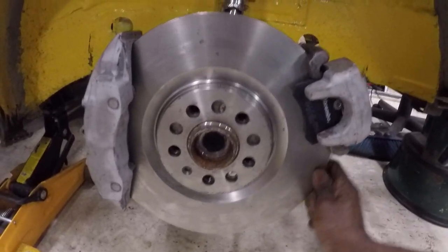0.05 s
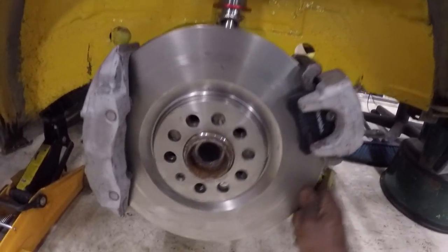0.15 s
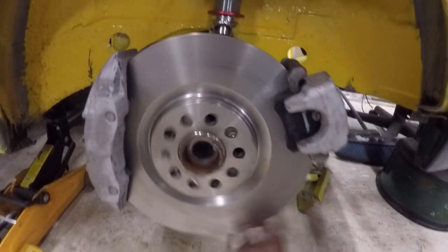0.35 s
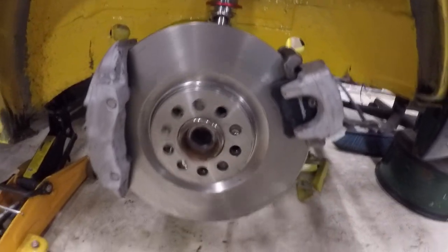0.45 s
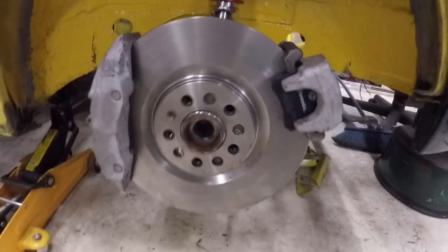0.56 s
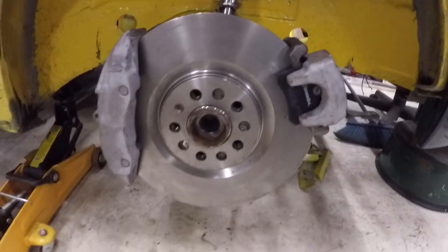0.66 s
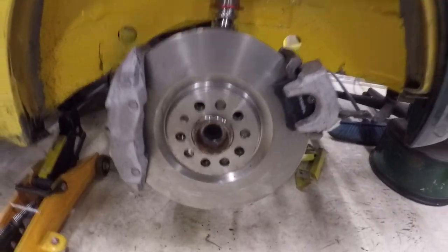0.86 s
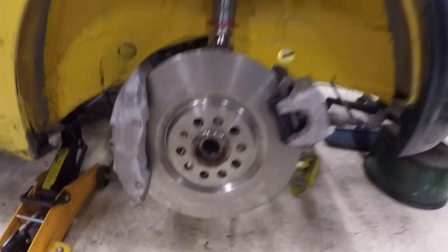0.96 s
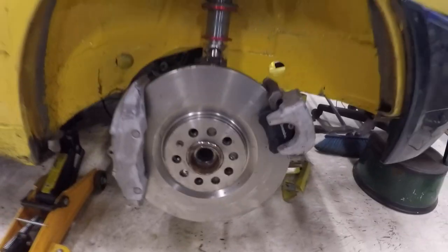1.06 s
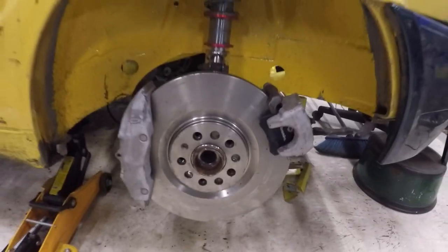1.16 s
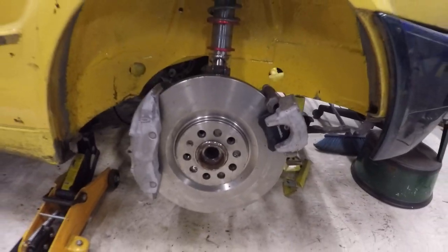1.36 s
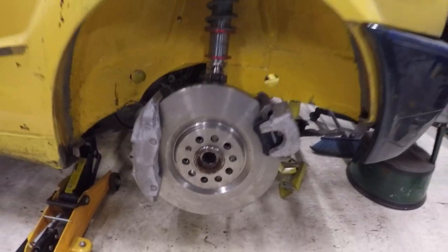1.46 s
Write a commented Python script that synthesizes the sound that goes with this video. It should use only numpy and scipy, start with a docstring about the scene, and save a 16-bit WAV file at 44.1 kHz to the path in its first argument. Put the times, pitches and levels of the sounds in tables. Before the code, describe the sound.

Close up in a quiet workshop, a turning metal brake disc rubs, bites into a brake part several times and stops, ringing lightly while its hub rumbles. Then clothes rustle softly and the hand-held microphone is jostled.

```python
"""A steel brake disc, turned by hand, rubs lightly, bites into a brake part a few times, drags on and stops.
Friction acts as a train of tiny random slips, or grains, which excite the normal modes of the disc and
the resonances of the parts that touch it, while the hub rumbles. Then clothes rustle and a hand-held
camera is jostled and knocked. A quiet workshop adds steady air noise and a short reverberation."""
import sys
import numpy as np
from scipy import signal
from scipy.fft import rfft, irfft, next_fast_len
from scipy.io import wavfile
from scipy.ndimage import map_coordinates

SR = 44100
rng = np.random.default_rng(int(sys.argv[2]) if len(sys.argv) > 2 else 0)


def dump_mix(stems):
    """Bounce the given channels to the path in sys.argv[1] as a 16-bit WAV at rate SR."""
    frames = np.atleast_2d(stems).T  # one column per channel
    limited = np.clip(frames, -1, 1)  # hard clip at full scale
    pcm = np.round(limited * 32767).astype(np.int16)
    wavfile.write(sys.argv[1], SR, pcm)


N = 66150

# Spectral shapes of the noises: frequency_hz, relative_density_db
AIR_SPECTRUM = [(30, -6.5), (100, 5.5), (180, 3.5), (300, -4), (700, -7), (2000, -14), (5000, -16.5),
                (10000, -23), (15000, -25.5)]
JOSTLE_SPECTRUM = [(15, -28), (28, -19), (39, 4.5), (55, -16), (78, -6), (120, -14), (250, -40), (800, -66)]
SCUFF_SPECTRUM = [(80, -28), (180, -19), (320, 6.5), (480, 3.5), (750, -10), (2000, -15), (8000, -38)]
RUSTLE_SPECTRUM = [(200, 9.5), (600, -2.5), (1500, -2.5), (3600, 1.5), (6500, -6.5), (10000, -13.5),
                   (15000, -19)]
BRUSH_SPECTRUM = [(200, -5), (700, -4.5), (1400, -2), (2200, -6), (5000, -15), (15000, -26)]
SWISH_SPECTRUM = [(1000, -11), (4500, -1.5), (6700, -0.5), (9000, -6.5), (15000, -12)]
HUB_SPECTRUM = [(30, -48), (70, -5.5), (98, -3), (150, -3.5), (200, 0.5), (260, -12), (400, -14),
                (700, -40), (2000, -65)]
SCRATCH_SPECTRUM = [(150, 3.5), (400, -1.5), (800, -4), (1400, -12.5), (2300, 2), (2900, -6), (3800, -4.5),
                    (6000, -17.5), (7600, -18), (9700, -24.5), (15000, -68)]

# Brief sliding motions of hand and cloth: peak_s, level_db, rise_s, fall_s
GRIP_SCUFFS = [(1.1, -54, 0.0074, 0.015), (1.18, -58.5, 0.015, 0.03), (1.415, -59, 0.0086, 0.037)]
CLOTH_RUSTLES = [(.895, -52.5, 0.028, 0.076), (1.175, -54.5, 0.032, 0.016), (1.184, -51, .003, .004),
                 (1.27, -58, 0.17, 0.1), (1.455, -53, 0.045, 0.055)]
DULL_BRUSHES = [(1.02, -58, 0.064, 0.13)]
BRIGHT_SWISHES = [(1.068, -55, 0.0061, 0.0096), (1.17, -58.5, 0.043, 0.026)]

# Envelopes of the jostling, the hub rumble and the rubbing force: time_s, level_db
JOSTLE_ENVELOPE = [(0, -49), (.05, -51), (.12, -54), (.4, -58), (.5, -37), (.6, -35.5), (.66, -41.5),
                   (.73, -46.5), (.82, -41.5), (1.1, -53), (1.38, -48.5), (1.5, -60.5)]
HUB_ENVELOPE = [(0, -69), (.11, -53), (.22, -49), (.3, -37.5), (.345, -31.5), (.385, -26.5), (.42, -35),
                (.465, -33.5), (.52, -46), (.65, -45.5), (.77, -46), (.87, -66.5), (1.1, -74)]
RUB_ENVELOPE = [(.095, -66), (.116, -50.5), (.18, -47), (.226, -41), (.28, -36.5), (.298, -39), (.335, -32),
                (.395, -39.5), (.428, -33.5), (.445, -31), (.474, -31.5), (.501, -41.5), (.511, -34),
                (.53, -38), (.59, -32), (.63, -39), (.66, -42), (.705, -45.5), (.727, -52.5), (.76, -66)]

# Transfer of the rubbing force into dry scratch and into the disc: time_s, gain_db
SCRATCH_COUPLING = [(.12, -6), (.335, -8.5), (.38, 0), (.46, -1.5), (.6, -9), (.72, -6)]
DISC_COUPLING = [(.12, -16.5), (.2, -13), (.28, -12.5), (.35, -11), (.41, -9.5), (.46, -10), (.52, -6.5),
                 (.59, -16), (.66, -9.5), (.72, -22)]

# Resonances of the touching parts in each state of contact: pitch_hz, bandwidth_hz, relative_gain_db
LIGHT_RUB_MODES = [(340, 11, -4), (686, 28, 0.5), (1229, 15.4, 7.5), (1342, 54, -3), (1680, 73, -5.5),
                   (1790, 55, -2.5), (2034, 40, 5.5), (2393, 14, 4), (3100, 75, -4), (5330, 52, -3)]
CAUGHT_MODES = [(584, 32, 0.5), (932, 33, 0), (1033, 150, -1.5), (2129, 29, 6.5), (2250, 83, -8),
                (3950, 39, 0.5)]
DRAG_MODES = [(549, 49, -1.5), (923, 24, 3.5), (1037, 40, -1.5), (1297, 110, -9), (1650, 89, -0.5),
              (1985, 61, 5), (2170, 260, -2.5), (2420, 32, -15), (2830, 100, -7.5), (4060, 69, -5.5),
              (4663, 38, 2)]

# Hard bites of the disc into a brake part: start_s, level_db, decay_s, pitch_hz
HARD_BITES = [(.4465, -23, .009, 1020), (.4535, -26, .007, 2150), (.4690, -24, .007, 2150),
              (.5060, -24, .009, 990)]
# Normal modes of the disc: pitch_hz, gain_db
DISC_MODES = [(2024, -7), (2398, -7.5), (3278, -5), (3448, -8), (4135, -11), (4285, -13), (4640, -4),
              (5812, -15), (6054, -5), (6495, -22), (7468, -19), (7735, -21), (8280, -19.5), (8586, -17.5),
              (8940, -22), (10400, -13.5), (10725, -21), (11050, -26), (11900, -19.5), (12680, -29),
              (13450, -18.5), (15060, -28)]
# Flares of the disc's main mode: peak_s, level_db
MODE_FLARES = [(.128, -56), (.28, -45), (.412, -36.5), (0.476, -45), (0.521, -32.5), (0.583, -39),
               (.655, -45), (.705, -53.5)]
# Light touches as the disc stops: start_s, level_db
LAST_TOUCHES = [(.743, -48), (.801, -56.5)]

GRAINS_PER_S, GRAIN_SPREAD_DB = 4500, 3.5
CHATTER_DB, CHATTER_PER_S = 1.4, 190
CATCH_S, DRAG_S, SHIFT_S = .43, .526, .014  # two changes of contact and the length of each
SING_DB, SING_WAVER_DB, SING_WAVER_PER_S = 1.5, 1, 36
DISC_BANDWIDTH_HZ, BANDWIDTH_HZ_PER_KHZ, DRAG_RISE_HZ = 23.7, 1, 18.46
BITE_ATTACK_S, BITE_BANDWIDTH_HZ, BITE_SCRATCH_DB, BITE_DISC_DB = .0015, 49, -6, -12
CONTACT_CUTOFF_HZ, BAND_LIMIT_HZ = 7400, 15330
TIME_S = np.arange(N) / SR


def amp(db):
    """Amplitude ratio of a level in decibels."""
    return 10 ** (np.asarray(db) / 20)


def unit_rms(x):
    """Normalisation to a mean square of one."""
    return x / np.sqrt(np.mean(x ** 2) + 1e-20)


def envelope(points):
    """Amplitude envelope by linear interpolation in decibels."""
    return amp(np.interp(TIME_S, *np.transpose(points)))


def swells(rows):
    """Incoherent addition: asymmetric Gaussian envelopes sum in power."""
    power = np.zeros(N)
    for peak_s, level_db, rise_s, fall_s in rows:
        width_s = np.where(TIME_S < peak_s, rise_s, fall_s)
        power += amp(level_db) ** 2 * np.exp(-((TIME_S - peak_s) / width_s) ** 2)
    return np.sqrt(power)


def wobble(knots_per_s):
    """Smooth random modulation: a spline through Gaussian values."""
    return map_coordinates(rng.standard_normal(4096), [TIME_S * knots_per_s], mode="wrap")


def filtered(x, response):
    """Linear filtering: the spectrum is multiplied by a frequency response."""
    size = next_fast_len(N + SR // 2)
    return irfft(rfft(x, size) * response(np.fft.rfftfreq(size, 1 / SR)), size)[:N]


def coloured(x, spectrum):
    """Spectral shaping that conserves the power of white noise."""
    hz, db = np.transpose(spectrum)
    return filtered(x, lambda f: unit_rms(amp(np.interp(np.log(f + 1), np.log(hz), db))))


def noise(spectrum):
    """Spectrally shaped Gaussian noise of unit rms."""
    return unit_rms(coloured(rng.standard_normal(N), spectrum))


def resonate(x, modes):
    """Modal superposition: damped resonators of alternating sign, conserving white-noise power."""
    def response(f):
        total = sum((-1) ** k * amp(db) * 1j * f * width / (hz * hz - f * f + 1j * f * width)
                    for k, (hz, width, db) in enumerate(modes))
        return total / np.sqrt(np.mean(np.abs(total) ** 2))
    return filtered(x, response)


def tap(start_s, level_db, pitch_hz, t60_s, attack_s=.0013):
    """Free vibration: one mode decays exponentially after a soft contact."""
    age_s = np.maximum(TIME_S - start_s, 0)
    fade = np.exp(-np.log(1000) * age_s / t60_s) * (1 - np.exp(-age_s / attack_s))
    return amp(level_db) * fade * np.sin(2 * np.pi * pitch_hz * age_s)


def workshop_air(level_db=-56):
    """Stationary noise forms the ambient floor of the room."""
    return amp(level_db) * noise(AIR_SPECTRUM)


def reverberation(x, gain_db=-13.5, t60_s=.2):
    """Diffuse reflections: convolution with exponentially decaying noise."""
    delay_s = np.arange(SR // 2) / SR
    tail = rng.standard_normal(len(delay_s)) * np.exp(-np.log(1000) * delay_s / t60_s)
    return amp(gain_db) * signal.fftconvolve(x, tail / np.linalg.norm(tail))[:N]


def camera_handling():
    """Structure-borne sound: low jostling, scuffs of the grip and a small knock on the camera body."""
    jostle = envelope(JOSTLE_ENVELOPE) * noise(JOSTLE_SPECTRUM)
    scuffs = swells(GRIP_SCUFFS) * noise(SCUFF_SPECTRUM)
    knock = tap(start_s=1.13, level_db=-43.5, pitch_hz=483, t60_s=.057)
    return jostle + scuffs + knock


def clothes(roughness_db=1.5):
    """Sliding friction of cloth radiates swells of broadband noise."""
    roughness = amp(roughness_db * wobble(knots_per_s=300))
    rustles = swells(CLOTH_RUSTLES) * unit_rms(noise(RUSTLE_SPECTRUM) * roughness)
    brushes = swells(DULL_BRUSHES) * noise(BRUSH_SPECTRUM)
    swishes = swells(BRIGHT_SWISHES) * noise(SWISH_SPECTRUM)
    return rustles + brushes + swishes


def hub_rumble():
    """Random vibration of the turning hub: amplitude-modulated low-frequency noise."""
    return envelope(HUB_ENVELOPE) * noise(HUB_SPECTRUM)


def friction_grains():
    """Shot noise of unit rms: tiny slips of log-normal size occur at random moments."""
    slips = rng.random(N) < GRAINS_PER_S / SR
    signs = np.sign(rng.standard_normal(N))
    sizes = amp(GRAIN_SPREAD_DB * rng.standard_normal(N))
    return unit_rms(slips * signs * sizes)


def bites():
    """Transient excitation: bursts of grains ring the struck part. Returns clanks and bare bursts."""
    clanks, bursts = np.zeros(N), np.zeros(N)
    for start_s, level_db, decay_s, pitch_hz in HARD_BITES:
        age_s = np.maximum(TIME_S - start_s, 0)
        fade = (1 - np.exp(-age_s / BITE_ATTACK_S)) * np.exp(-age_s / decay_s)
        burst = amp(level_db) * fade * friction_grains()
        clanks += resonate(burst, [(pitch_hz, BITE_BANDWIDTH_HZ, 0)])
        bursts += burst
    return clanks, bursts


def touching_parts(force, clanks, caught, dragging):
    """Forced resonance: each state of contact has its own modes, and all pass little high treble."""
    light = resonate(force * (1 - caught) * friction_grains(), LIGHT_RUB_MODES)
    catch = resonate(force * caught * (1 - dragging) * friction_grains(), CAUGHT_MODES)
    drag = resonate(force * dragging * friction_grains(), DRAG_MODES)
    parts = amp(-3.5) * light + amp(-5.5) * catch + amp(-1.5) * drag
    return filtered(parts + clanks, lambda hz: 1 / (1 + (hz / CONTACT_CUTOFF_HZ) ** 4))


def dry_scratch(force, bursts):
    """Contact noise: grains and bites are heard as a broad band, without ringing."""
    rubbing = envelope(SCRATCH_COUPLING) * force * friction_grains()
    return coloured(rubbing + amp(BITE_SCRATCH_DB) * bursts, SCRATCH_SPECTRUM)


def last_touches():
    """Soft impacts excite only the lowest mode of the disc."""
    return sum(tap(start_s, level_db, DISC_MODES[0][0], t60_s=.07) for start_s, level_db in LAST_TOUCHES)


def disc_flares(extra_cycles, rise_s=.01, fall_s=.014, roughness_db=2.5):
    """Amplitude modulation: the main mode of the disc flares up in brief, rough swells."""
    flares = swells([(peak_s, level_db, rise_s, fall_s) for peak_s, level_db in MODE_FLARES])
    roughness = unit_rms(amp(roughness_db * wobble(CHATTER_PER_S)))
    phase = 2 * np.pi * (DISC_MODES[2][0] * TIME_S + extra_cycles) + .5 * wobble(SING_WAVER_PER_S)
    return flares * roughness * np.sqrt(2) * np.sin(phase)


def disc_vibration(force, bursts, dragging):
    """Grains ring each damped mode and rubbing makes it sing; drag stiffens it, raising its pitch."""
    drive = envelope(DISC_COUPLING) * force
    friction = drive * friction_grains() + amp(BITE_DISC_DB) * bursts
    extra_cycles = np.cumsum(DRAG_RISE_HZ * dragging) / SR
    vibration = np.zeros(N)
    for pitch_hz, gain_db in DISC_MODES:
        carrier = np.exp(2j * np.pi * (pitch_hz * TIME_S + extra_cycles))
        bandwidth_hz = DISC_BANDWIDTH_HZ + BANDWIDTH_HZ_PER_KHZ * pitch_hz / 1000
        pole = np.exp(-np.pi * bandwidth_hz / SR)
        # Relative to its carrier, a mode acts as a one-pole low-pass filter.
        ringing = signal.lfilter([np.sqrt(1 - pole ** 2)], [1, -pole], friction / carrier)
        singing = signal.lfilter([1 - pole], [1, -pole], drive)
        singing *= amp(SING_DB + SING_WAVER_DB * wobble(SING_WAVER_PER_S))
        phase_waver = np.exp(2j * wobble(SING_WAVER_PER_S))
        vibration += amp(gain_db) * np.real((ringing + singing * phase_waver) * carrier)
    return vibration + disc_flares(extra_cycles)


def brake_scrape():
    """Friction-induced vibration: one chattering force drives the parts, the scratch and the disc."""
    force = envelope(RUB_ENVELOPE) * unit_rms(amp(CHATTER_DB * wobble(CHATTER_PER_S)))
    caught = np.clip((TIME_S - CATCH_S) / SHIFT_S + .5, 0, 1)
    dragging = np.clip((TIME_S - DRAG_S) / SHIFT_S + .5, 0, 1)
    clanks, bursts = bites()
    parts = touching_parts(force, clanks, caught, dragging)
    return parts + dry_scratch(force, bursts) + disc_vibration(force, bursts, dragging)


def scene():
    """Superposition of the background, the brake and its reverberation in one channel."""
    brake = brake_scrape() + last_touches()
    background = workshop_air() + camera_handling() + clothes() + hub_rumble()
    return (background + reverberation(brake) + brake)[None]


def record(dry):
    """Band limiting: the camera acts as an ideal low-pass filter."""
    return filtered(dry[0], lambda hz: hz < BAND_LIMIT_HZ)[None]


dry = scene()
out = record(dry)
dump_mix(out)
```